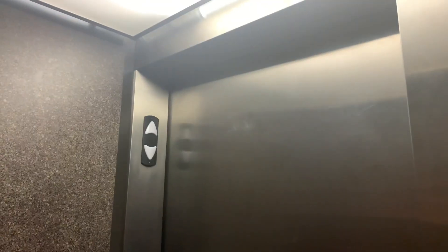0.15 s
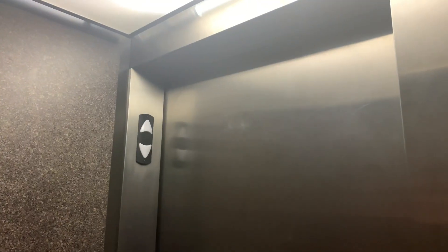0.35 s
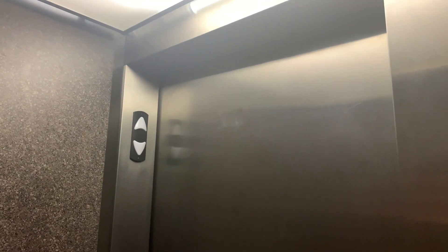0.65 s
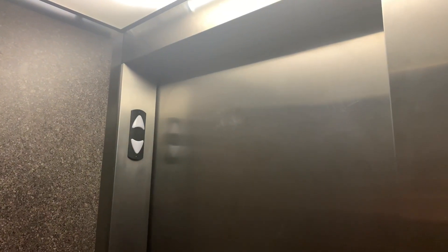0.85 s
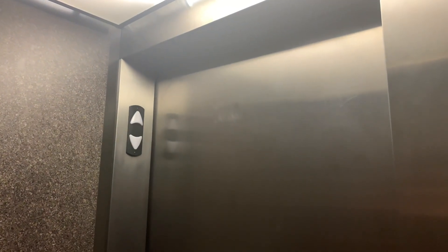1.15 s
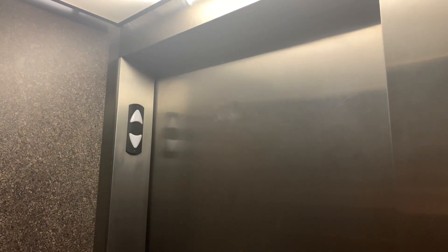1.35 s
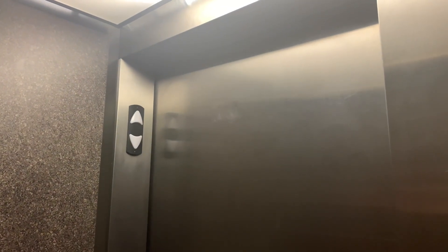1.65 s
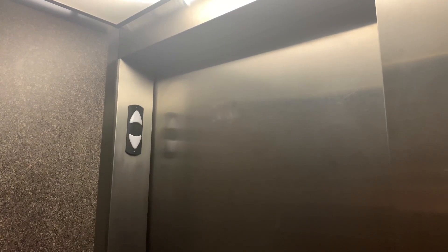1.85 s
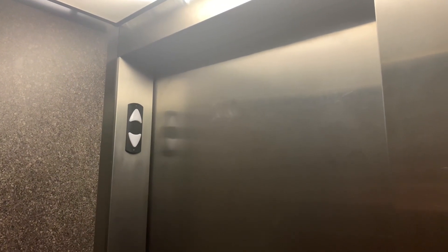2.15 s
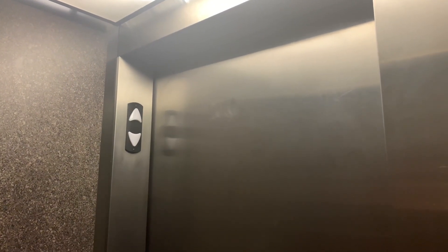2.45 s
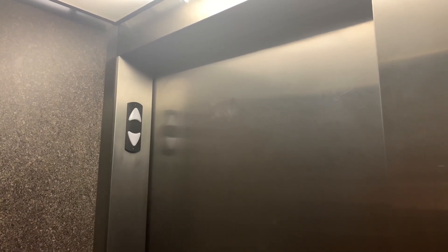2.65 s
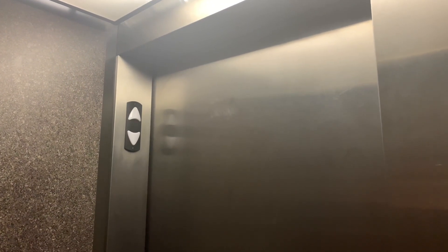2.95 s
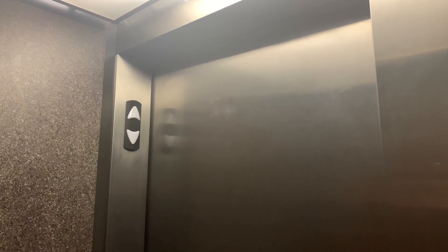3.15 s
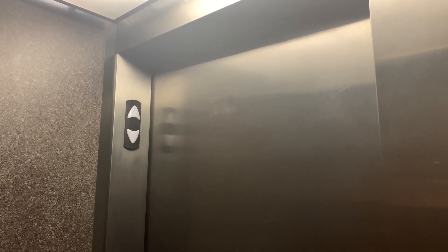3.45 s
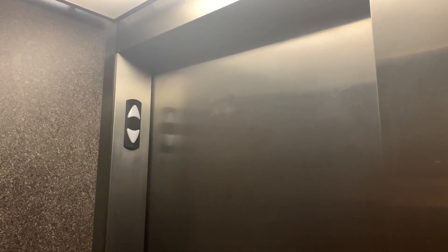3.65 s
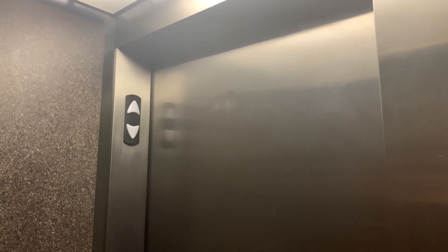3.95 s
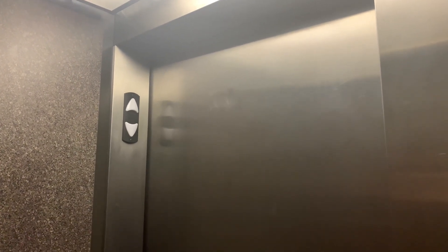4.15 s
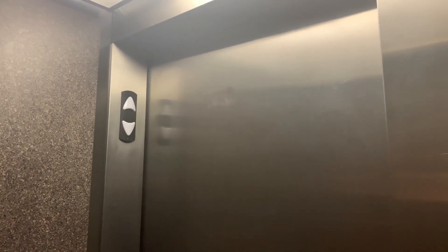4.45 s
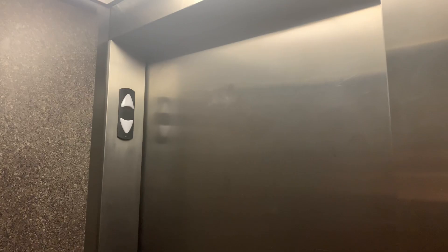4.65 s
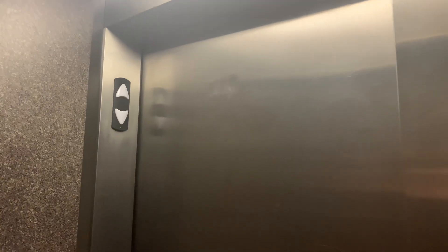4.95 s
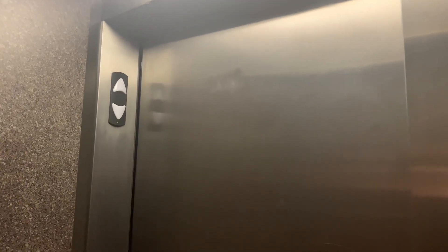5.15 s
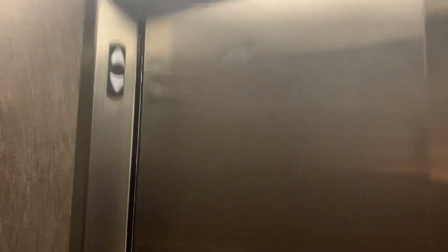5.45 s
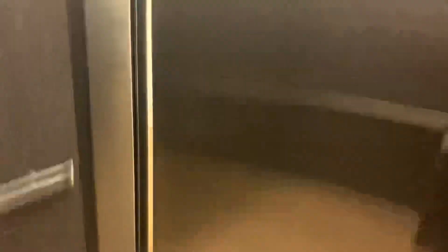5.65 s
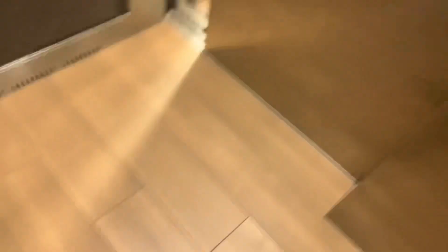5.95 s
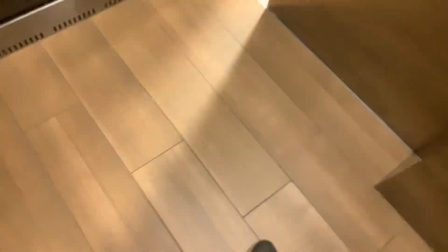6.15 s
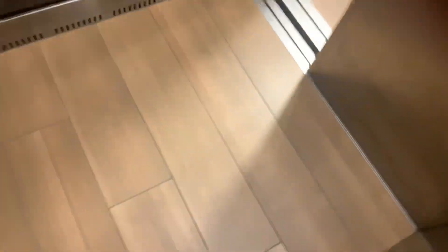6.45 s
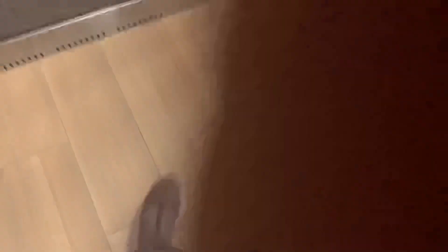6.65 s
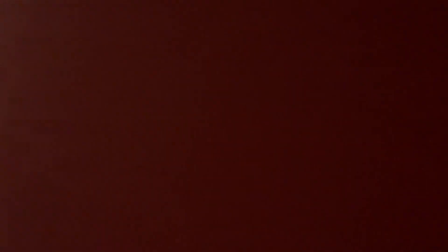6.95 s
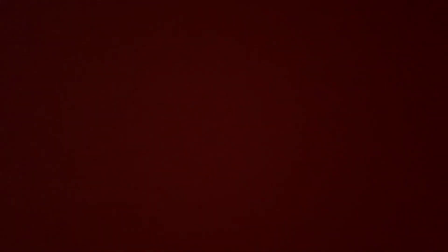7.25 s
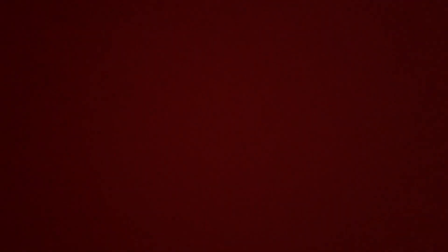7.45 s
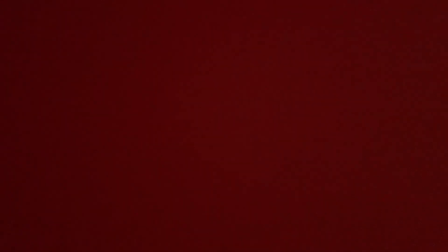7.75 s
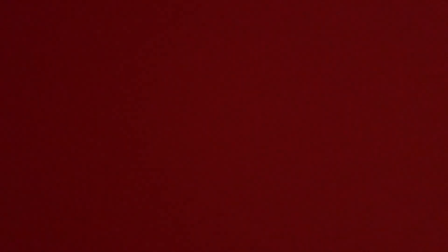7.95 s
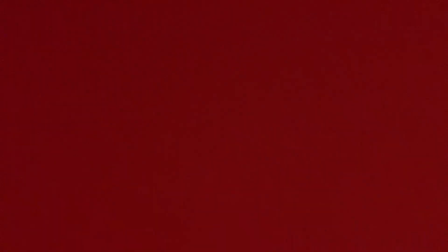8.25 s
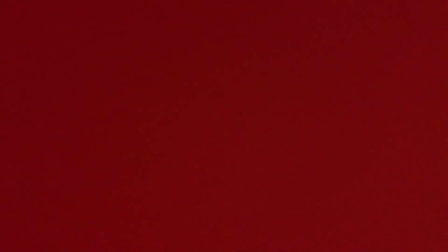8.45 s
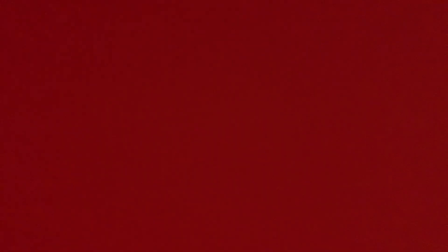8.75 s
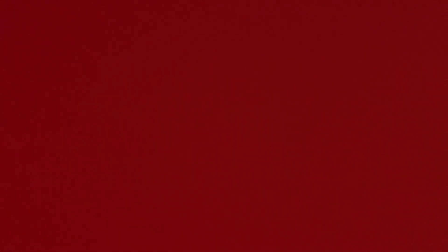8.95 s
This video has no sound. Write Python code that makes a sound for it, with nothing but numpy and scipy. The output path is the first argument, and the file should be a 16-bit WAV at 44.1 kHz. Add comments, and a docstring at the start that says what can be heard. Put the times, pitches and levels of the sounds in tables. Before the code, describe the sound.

Inside a steel elevator, pump hum and low rumble slow to a stop, then the door whirs open, bumps and slams with a loud metallic clang.

```python
"""Inside a hydraulic elevator

The steel cab rides on pump hum and rumble while shaft hardware clacks past, then stops.
The lock clatters, the door motor whines up and the door rolls open; fingers knock on the handheld microphone.
The door bumps its stop, and its linkage slams and rattles.
Wavering tones make the machines; shaped noise makes the flow, the rolling and the ringing blows."""
import sys
import numpy as np
from scipy import signal
from scipy.fft import irfft, next_fast_len
from scipy.io import wavfile
from scipy.ndimage import map_coordinates

SR = 44100
rng = np.random.default_rng(int(sys.argv[2]) if len(sys.argv) > 2 else 0)


def dump_mix(stems):
    """Bounce the given channels to the path in sys.argv[1] as a 16-bit WAV at rate SR."""
    frames = np.atleast_2d(stems).T  # one column per channel
    limited = np.clip(frames, -1, 1)  # hard clip at full scale
    pcm = np.round(limited * 32767).astype(np.int16)
    wavfile.write(sys.argv[1], SR, pcm)


N = 400869
TIME = np.arange(N) / SR
LEFT_LEAD_S = 0.000426  # sound reaches the left microphone this much earlier

# Spectrum tables give a shape only: noise() brings every noise to the same size.
# loudness of the left microphone against the right: pitch_hz, left_minus_right_db
BALANCE = [(60, -2), (150, -2), (400, -1), (1000, 1), (4000, -1)]
# effort of the door drive, heard in its whir: time_s, level_db
DOOR_EFFORT = [(5.3, -16), (5.57, -9), (5.67, 1), (5.81, -1.5), (6.09, -0.5), (6.35, -3), (6.48, -5.5),
               (6.71, -8), (6.82, -7), (7.08, -6), (7.35, -11), (7.55, -10.5), (7.7, -8), (7.78, -13.5)]
# spectrum of a hard steel clack: pitch_hz, level_db per Hz
CLACK_SPECTRUM = [(30, 9.5), (80, 4.5), (210, -3), (320, 7), (560, -3), (1000, -1), (1250, 1), (1420, -1.5),
                  (1600, -2), (1850, -1), (1980, -7.5), (2130, 0), (2280, -5), (2480, -5.5), (3400, -13),
                  (4300, -13), (7500, -22.5), (9600, -19), (12000, -14.5), (16000, -31)]


def amp(db):
    """Turn decibels into a gain."""
    return 10 ** (np.asarray(db) / 20)


def read(points, hz):
    """Read a curve over pitch, joined by straight lines over log frequency."""
    f, value = np.transpose(points)
    return np.interp(np.log(hz + 1), np.log(f + 1), value)


def level(rows, fade=0.052):
    """Gain along a curve of (time_s, level_db), fading out beyond its ends."""
    times, db = np.transpose(rows)
    outside = np.maximum(times[0] - TIME, 0) + np.maximum(TIME - times[-1], 0)
    return amp(np.interp(TIME, times, db)) * np.exp(-outside / fade)


def swell(start, rise, decay, hold=0):
    """Gain that rises steadily, holds and dies away; times in s."""
    age = TIME - start
    return np.clip(age / rise, 0, 1) * np.exp(-np.maximum(age - rise - hold, 0) / decay)


def ramp(start, length):
    """A steady change from 0 to 1; times in s."""
    return np.clip((TIME - start) / length, 0, 1)


def run_down(start, length):
    """Gain that fades ever faster, as of something that coasts to a halt; times in s."""
    return np.exp(-(np.maximum(TIME - start, 0) / length) ** 2)


def add(mix, s, sound):
    """Mix a sound in at time s, cutting off what runs past the end."""
    part = mix[:, round(s * SR):][:, :sound.shape[1]]
    part += sound[:, :part.shape[1]]


def drift(per_s):
    """Random wandering of about unit size, with per_s new random values each second."""
    knots = rng.standard_normal(2048)
    return map_coordinates(knots, [TIME[::64] * per_s], mode="wrap").repeat(64)[:N]


def resonances(modes):
    """Gain over frequency of a set of modes: (pitch_hz, width_hz, level_db); the power halves about 0.4
    width_hz from each peak."""
    def gain(hz):
        power = sum(amp(2 * db) / (1 + ((hz - f) / width) ** 2) ** 4.6 for f, width, db in modes)
        return np.sqrt(power)
    return gain


def noise(colour, size=N, tilt_db=0, ripple_db=0):
    """Diffuse noise at two microphones, alike in the bass; ripple is the comb of many crowded modes."""
    # how alike left and right are: pitch_hz, likeness (1 = identical)
    likeness = [(60, 0.98), (130, 0.72), (290, 0.91), (640, 0.26), (1410, 0.23), (3100, 0.036),
                (15000, 0.31)]
    hz = np.fft.rfftfreq(next_fast_len(size + size % 2, True) // 2 * 2, 1 / SR)
    a, b = rng.standard_normal((2, len(hz))) + 1j * rng.standard_normal((2, len(hz)))
    same = np.clip(read(likeness, hz), -1, 1)
    left = a * np.exp(2j * np.pi * hz * LEFT_LEAD_S)
    right = same * a + np.sqrt(1 - same ** 2) * b
    pair = np.array([left, right]) * amp(read(BALANCE, hz) * np.array([[.5], [-.5]]))
    bumps = np.interp(hz, np.linspace(0, SR / 2, 300), rng.standard_normal(300))
    comb = bumps * np.minimum(hz / 2000, 1)
    gain = colour(hz) if callable(colour) else amp(read(colour, hz))
    tilt = tilt_db * np.log2(np.maximum(hz, 200))  # tilt in dB per octave above 200 Hz
    x = irfft(pair * gain * (hz > 28) * amp(tilt + ripple_db * comb))[:, :size]
    return x / x.mean(0).std()


def tone(hz, waver, flutter, per_s):
    """A machine tone wavering in pitch and level, leading at the left by up to a quarter cycle."""
    phase = 2 * np.pi * np.cumsum(hz * (1 + waver * drift(per_s)) * np.ones(N)) / SR
    apart = min(2 * np.pi * np.mean(hz) * LEFT_LEAD_S, np.pi / 2)
    sides = amp(read(BALANCE, np.mean(hz)) * np.array([[.5], [-.5]]))
    return np.sqrt(2) * sides * np.cos([phase + apart, phase]) * (1 + flutter * drift(per_s))


def blow(colour, db, tilt_db, rise, ripple_db=3):
    """A blow sets countless panel and cab modes ringing; the treble dies first."""
    # cab reverberation: pitch_hz, time_to_fall_60_db_s
    ring = [(60, 1), (250, 1), (1000, 0.41), (3000, 0.52), (7000, 0.48), (16000, 0.16)]
    struck = noise(colour, size=49152, tilt_db=tilt_db, ripple_db=ripple_db)
    hz, t, z = signal.stft(struck, SR, nperseg=512)
    x = signal.istft(z * amp(-60 * t / read(ring, hz)[:, None]), SR, nperseg=512)[1]
    return amp(db) * x * np.minimum(np.arange(x.shape[1]) / SR / max(rise, 1e-4), 1)


def burst(colour, db, decay, rise, tilt_db=0):
    """The short direct sound of a hard contact."""
    t = np.arange(8192) / SR
    return amp(db) * noise(colour, size=8192, tilt_db=tilt_db) * np.exp(-t / decay) * (1 - np.exp(-t / rise))


def cab_reflections(x, t60):
    """Dense reflections between the steel walls smear a tone."""
    t = np.arange(SR // 2) / SR
    tail = rng.standard_normal((2, len(t))) * amp(-60 * t / t60)
    return signal.fftconvolve(x, tail / np.linalg.norm(tail[0]), axes=1)[:, :N]


def cab_boom():
    """The cab booms in its lowest modes as it sways along the rails and comes to rest."""
    # lowest modes of the cab, before the sway: pitch_hz, level_db
    modes = [(37, -34), (55, -22.5), (70.5, -6.5), (83, -2.5)]
    # spectrum of the rumble: pitch_hz, level_db per Hz
    rumble = [(28, -20), (36, -1.5), (50, 0), (75, 8), (90, 4.5), (110, -9.5), (135, -9.5), (170, -24),
              (400, -78)]
    # level of the boom: time_s, level_db
    sway = [(0.0, -30), (0.7, -24), (1.0, -29.5), (1.38, -22.5), (1.6, -28), (1.92, -20), (2.2, -29.5),
            (2.6, -28), (3.15, -23.5), (3.55, -29.5), (3.97, -44), (4.5, -49.5)]
    boom = sum(amp(db) * tone(hz, waver=0.02985, flutter=0.23, per_s=9) for hz, db in modes)
    return (boom + amp(-4.5) * noise(rumble)) * level(sway)


SLOW_AT_S, CHANGE_S = 1.55, 0.16  # the pump drops to levelling speed
RUN_DOWN_S = 0.56  # the pump, and the oil with it, run down


def pump():
    """The pump sings steady tones whose balance shifts at levelling speed; switched off, it runs down."""
    # pump tones, before the trim: pitch_hz, full_speed_level_db, levelling_level_db
    tones = [(190, -52.5, -48), (255.4, -45.5, -47), (328, -61.5, -65.5), (348.2, -46, -43.5),
             (402, -69, -60), (394, -58.5, -56.5), (471.7, -41, -42), (621, -48, -57.5),
             (613.6, -55.5, -47), (675, -71.5, -58.5), (710, -47, -56.5), (819, -64, -48),
             (870, -67.5, -66), (1056, -58, -55), (1157, -59, -54.5), (1415, -61.5, -71.5),
             (1770, -63, -66)]
    trim_db, off_at_s = -1, 3.22
    slow = ramp(SLOW_AT_S, CHANGE_S)  # the load on the pump changes
    song = 0
    for hz, fast_db, slow_db in tones:
        gain = amp(fast_db + slow * (slow_db - fast_db))
        song = song + gain * tone(hz, waver=0.00305, flutter=0.29, per_s=8)
    return amp(trim_db) * song * run_down(off_at_s, RUN_DOWN_S)


def oil():
    """Pulsing oil rush: it surges as the pump slows, then the valve shuts off most of the flow."""
    # spectrum of the flow: pitch_hz, level_db per Hz
    spectrum = [(70, -3), (130, 6), (200, -4.5), (250, -1), (295, -6.5), (340, -2), (380, -4.5), (450, 0.5),
                (540, -3.5), (660, -2.5), (790, -8), (880, -8.5), (980, -14.5), (1350, -16.5), (1480, -21),
                (1800, -25.5), (2400, -33.5), (3600, -56), (8000, -76.5), (16000, -86.5)]
    surge_db, surge_decay_s = 4.5, 0.28
    flow_db, shut_at_s, shut_s, shut_db = -37.5, 3.66, 0.05, -10
    pulsing = 1 + .22 * np.cos(2 * np.pi * 58.6 * TIME)
    surge = surge_db * swell(SLOW_AT_S, CHANGE_S, surge_decay_s)
    oil_db = flow_db + surge + shut_db * ramp(shut_at_s, shut_s)
    # the slowing flow crosses over to a darker one within 0.19 s
    slowed = ramp(shut_at_s + .05, 0.19)
    flow = noise(spectrum) * np.sqrt(1 - slowed)
    flow = flow + noise(spectrum, tilt_db=-4.5) * np.sqrt(slowed)
    return flow * pulsing * amp(oil_db + 1.0 * drift(21)) * run_down(shut_at_s, RUN_DOWN_S)


def valve():
    """Oil rushes through the narrowing valve, murmurs as it seats and puffs as it closes fully."""
    # rush and puff spectra: pitch_hz, level_db per Hz
    rush = [(120, 1.5), (190, 3.5), (260, -0.5), (295, -12), (345, 3.5), (420, -16), (600, -16), (760, -12),
            (940, -13.5), (1130, -14.5), (1700, -26.5), (3000, -48), (10000, -71.5), (16000, -75)]
    puff = [(300, -4), (900, 0), (1500, -5), (2400, -9), (3500, -19), (6000, -27), (9000, -44),
            (16000, -60)]
    # resonances of the murmur at the valve seat: pitch_hz, width_hz, level_db
    seat = [(838, 74, 5.5), (1120, 200, -8), (560, 160, -8.5), (1380, 130, -16)]
    rush_at_s, rush_rise_s = 3.308, 0.17
    flow = amp(-36) * noise(rush) * ramp(rush_at_s, rush_rise_s)
    flow *= run_down(rush_at_s + rush_rise_s, 0.55)
    flow += amp(-53.5) * noise(resonances(seat)) * swell(3.795, rise=0.077, decay=0.12, hold=0.2)
    flow += amp(-57.5) * noise(puff) * swell(3.93, rise=.06, decay=.045, hold=.05)
    return flow


SLAM_AT_S = 8.005


def standing():
    """Steady low rumble and the noise of the powered door gear, both swelling at each shudder."""
    # spectra of the low rumble and of the body noise: pitch_hz, level_db per Hz
    low_spectrum = [(28, -24), (37, -3), (58, 1), (90, -3), (120, -7), (200, -52), (600, -60.5)]
    body_spectrum = [(70, -4), (170, 2.5), (300, 3), (460, 2.5), (620, -13), (900, -7.5), (1700, -11.5),
                     (3000, -23.5), (6000, -37.5), (16000, -120)]
    # the cab settles, unlocks and takes the door's blows:
    # start_s, low_rumble_db, body_db, rise_s, decay_s
    shudders = [(4.68, -28, -38, 0.16, 0.11), (4.98, -48, -47.5, 0.05, 0.4), (7.76, -35.5, -50, 0.084, 0.3),
                (7.99, -28.5, -29.5, 0.0065, 0.033), (8.2, -49, -44.5, 0.098, 0.42)]
    rest_db, gear_on_at_s, gear_idle_db, track_rumble_db = -49, 4.55, -51.5, -44.5
    # separate noises add up by power
    low_power = amp(rest_db) ** 2
    body_power = (amp(gear_idle_db) * ramp(gear_on_at_s, 0.028)) ** 2
    body_power = body_power + (amp(track_rumble_db) * level(DOOR_EFFORT)) ** 2
    for s, low_db, body_db, rise, decay in shudders:
        shake = swell(s, rise, decay)
        low_power = low_power + (amp(low_db) * shake) ** 2
        body_power = body_power + (amp(body_db) * shake) ** 2
    rattling = sum(noise(body_spectrum, ripple_db=5) * amp(2.5 * drift(16)) for _ in range(3)) / 2
    return noise(low_spectrum) * np.sqrt(low_power) + rattling * np.sqrt(body_power)


def landing_air():
    """Air of the landing comes in as the doorway widens, and is fainter once the door has stopped."""
    # spectrum of the air: pitch_hz, level_db per Hz
    spectrum = [(200, -3.5), (800, -2), (1300, -9.5), (2200, -5.5), (3300, -7.5), (5500, -11),
                (8000, -25.5), (11000, -25.5), (16000, -26.5)]
    hiss_db, open_db, after_db = -89, -48, -57.5
    # the power of 1.2 slows the start of the rise and quickens the decay
    opening = swell(4.94, rise=2.68, decay=0.18, hold=0.43) ** 1.2
    doorway = amp(open_db) * opening + amp(after_db) * ramp(SLAM_AT_S, 0.15)
    return noise(spectrum) * (amp(hiss_db) + doorway)


def clacks():
    """Shaft hardware knocks on the passing cab; a soft scrape swells up and ends at one of the clacks."""
    # passing switches and cams: time_s, level_db, brightness_db per octave, rise_s
    passing = [(0.368, -47.5, 3.5, 0.0085), (1.533, -43.5, 6.5, 0.022), (1.592, -26, 1, 0.0027),
               (1.612, -25.5, 0, 0.0026), (3.465, -30.5, 2.5, 0.0053), (3.495, -29, 0, 0.0035),
               (3.6, -28, -6.5, 0.0044), (3.749, -44.5, -3, 0.009)]
    out = np.zeros((2, N))
    fade = run_down(0, 0.38)  # each clack's ring fades out early
    for s, db, tilt_db, rise in passing:
        clack = blow(CLACK_SPECTRUM, db, tilt_db, rise)
        add(out, s, clack * fade[:clack.shape[1]])
    # squaring makes the scrape start gently and die twice as fast
    scrape = swell(3.3, rise=0.2, decay=0.02) ** 2
    return out + amp(-50) * noise(CLACK_SPECTRUM) * scrape


def lock():
    """The lock lifts and the coupler takes up its slack: uneven knocks, each favouring its own pitch region."""
    # knocks: time_s, level_db, brightness_db per octave, rise_s, favoured_hz, lift_there_db
    knocks = [(4.54, -54, 0.9, 0.0073, 805, -3), (4.56, -44.5, -4, 0.011, 750, 9),
              (4.669, -37, 0.5, 0.024, 1550, -1), (4.698, -31.5, 1, 0.016, 610, 3.5),
              (4.786, -35, 2.6, 0.027, 1450, 10), (4.832, -36, 0.5, 0.0045, 360, 2),
              (4.875, -43, -3, 0.0058, 1400, 3), (4.935, -39, -5.5, 0.0072, 480, 5),
              (5.035, -37.5, -4.5, 0.0088, 477, 7.5), (5.084, -49.5, -3.5, 0.008, 520, -1),
              (5.22, -46.5, -2.5, 0.024, 1600, 15), (5.265, -44, -2, 0.011, 1500, 10)]
    # spectrum of the latch's ring: pitch_hz, level_db per Hz
    latch = [(30, 2.5), (80, 6.5), (200, -11.5), (310, 2.5), (420, -5), (560, -0.5), (800, -5.5), (950, 3),
             (1150, -6.5), (1600, -10), (2100, -17), (2600, -18), (3200, -25), (5800, -25.5),
             (10000, -34.5), (16000, -31)]
    favoured_octaves, scrape_db = 0.26, 1.5  # width of the region, unevenness of the scraping
    out = np.zeros((2, N))
    for s, db, tilt_db, rise, favoured_hz, lift_db in knocks:
        def colour(hz):
            octaves_off = np.log2((hz + 1) / favoured_hz)
            return amp(read(latch, hz) + lift_db * np.exp(-(octaves_off / favoured_octaves) ** 2))
        knock = blow(colour, db, tilt_db, rise, ripple_db=5.5)
        add(out, s, knock * amp(scrape_db * drift(71))[:knock.shape[1]])
    return out


def squeaks():
    """Brief rough chirps of the door gear that swell and ring out in the cab."""
    # chirps, at their loudest after a quarter of the length: time_s, pitch_hz, level_db, length_s
    chirps = [(4.667, 1545, -52, .06), (4.784, 1780, -42, 0.05), (5.625, 4580, -54, .07),
              (5.668, 2400, -48, .08), (5.73, 2420, -51, .08), (5.735, 4740, -57, .06),
              (6.119, 4075, -51, 0.08), (7.932, 4110, -40, 0.03), (7.935, 2045, -24.5, 0.023),
              (7.956, 2015, -32, .013)]
    out, t = np.zeros((2, N)), np.arange(SR // 2) / SR
    for s, hz, db, length in chirps:
        u = t / (length / 4)
        ringing_out = .17 * (1 - np.exp(-u)) * np.exp(-t / .07)
        shape = u * np.exp(1 - u) + ringing_out
        rough = tone(hz, waver=70 / hz, flutter=.7, per_s=500)  # strays by about 70 Hz
        add(out, s, amp(db) * shape * rough[:, :len(t)])
    return out


def bumps():
    """The door hits its rubber coupler and end stop: a hard contact, a noisy ring and a few panel notes."""
    # hits, panel ring before a 2 dB cut: time_s, level_db, brightness_db per octave, rise_s, panel_ring_db
    hits = [(5.252, -32.5, -9.5, 0.035, -41), (7.798, -26.5, 1.5, 0.0015, -19),
            (7.822, -20.5, -22, 0.0032, -27), (7.847, -20.5, 0.6, 0.0043, -16),
            (7.92, -26, 3, 0.046, -20.5)]
    # spectrum of the hit: pitch_hz, level_db per Hz
    spectrum = [(30, -28), (120, -34), (230, 2.5), (340, 5.5), (640, 3.5), (850, -5.5), (1500, -4.5),
                (2100, -7.5), (3300, -10), (7000, -21), (10000, -22), (16000, -35)]
    # notes of the door panel, before the rubber's damping: pitch_hz, level_db, time_to_fall_60_db_s
    panel_notes = [(222, 1.5, 0.51), (258, -21, 0.19), (293, -16, 0.81), (485, -9.5, 0.46), (651, -8, 0.55)]
    out, t = np.zeros((2, N)), np.arange(49152) / SR
    panel = sum(amp(db - 60 * t / t60) * np.sin(2 * np.pi * hz * t) for hz, db, t60 in panel_notes)
    panel = panel * (1 - np.exp(-t / 0.0086))
    damping = np.exp(-t / 0.095)  # the rubber stays pressed against the door
    for s, db, tilt_db, rise, ring_db in hits:
        ring = blow(spectrum, db, tilt_db, rise) * np.sqrt(damping)
        add(out, s, ring + amp(ring_db - 2.0) * panel * damping)
        # the first contact is a little quieter and brighter than the ring
        add(out, s, burst(spectrum, db - 1, decay=0.0083, rise=rise, tilt_db=tilt_db + 3.5))
    return out


def motor():
    """The motor's whine climbs in steps through the housing's resonances: a firm core in a rough halo."""
    # the motor spins up: time_s, whine_pitch_hz
    spin_up = [(5.35, 1174), (5.4, 1230), (5.435, 1340), (5.49, 1357), (5.54, 1396), (5.565, 1510),
               (5.61, 1532), (5.66, 1517), (5.75, 1580)]
    # how strongly the drive housing passes the whine: pitch_hz, level_db
    whine_body = [(1150, -12), (1300, -6), (1390, 1), (1560, 3), (1700, -2), (2250, -5), (2450, 0),
                  (2700, 0), (2900, -17), (3120, -7), (3350, -17), (3750, -24), (4020, -18), (4250, -21),
                  (4600, -18), (5000, -24), (5450, -16), (5800, -24), (6600, -24), (7800, -24)]
    # housing resonances: pitch_hz, width_hz, level_db
    housing_modes = [(2356, 210, 4), (1660, 170, -4), (3260, 220, -10), (4400, 870, -13),
                     (5700, 490, -13.5)]
    # the housing rings as the motor takes up the load: start_s, level_db
    strains = [(5.38, -44.5), (5.545, -44.5), (5.655, -51), (5.72, -63)]
    core_db, halo_db = -45, -44.5
    whine_hz = np.interp(TIME, *np.transpose(spin_up))
    partials = []
    for k in range(1, 6):
        gain = amp(read(whine_body, k * whine_hz) + 2 * drift(40))
        partials.append((k * whine_hz, gain))
    core = sum(gain * tone(hz, waver=.007, flutter=.35, per_s=150) for hz, gain in partials)
    halo = sum(gain * tone(hz, waver=.04, flutter=.6, per_s=300) for hz, gain in partials)
    load = swell(5.335, rise=0.12, decay=0.039, hold=0.16)
    strain = sum(amp(db) * swell(s, rise=0.042, decay=0.044) for s, db in strains)
    housing = noise(resonances(housing_modes)) * amp(2.8 * drift(40)) * strain
    return amp(core_db) * core * load + cab_reflections(amp(halo_db) * halo * load, t60=0.24) + housing


def rollers():
    """Rollers whir along the track, with patches of pitch that swell and fade."""
    # spectrum of the whir: pitch_hz, level_db per Hz
    spectrum = [(300, -35), (680, -9), (800, -3), (860, 1), (950, 3), (1080, 1), (1200, -6), (1340, -2.5),
                (1500, -14), (1750, -20.5), (2150, -18), (3000, -36), (6000, -60)]
    roller_db = -40  # where the effort curve reads 0 dB
    # four noises with different ripples, drifting in level, make the moving patches
    whir = sum(noise(spectrum, ripple_db=6) * amp(4 * drift(14)) for _ in range(4)) / 2
    return amp(roller_db) * whir * level(DOOR_EFFORT)


def shoes():
    """Door shoes hiss in the sill, louder as the microphone turns their way, until a finger covers it a while."""
    # spectrum of the hiss: pitch_hz, level_db per Hz
    spectrum = [(1000, 11.5), (2200, -8), (3200, -6), (4500, 4), (7300, 0.5), (8400, -20), (10200, 12),
                (12000, -2), (13500, -20), (16000, -3)]
    slide_db, cover_db = -51.5, -34
    covered = ramp(6.62, 0.0087) - ramp(6.817, .004)
    # the power of 0.8 quickens the start of the rise and stretches the decay
    sliding = swell(5.377, rise=1.17, decay=0.034, hold=1.12) ** 0.8
    return noise(spectrum) * amp(1.4 * drift(60)) * sliding * amp(slide_db + cover_db * covered)


def chord(notes, bend):
    """Gear notes (pitch_hz, level_db) that each stray in pitch and swell on their own."""
    wander, swell_db = .006, 3.5
    total = 0
    for hz, db in notes:
        gain = amp(db + swell_db * drift(6))
        pitch = hz * bend * (1 + wander * drift(9))
        total = total + gain * tone(pitch, waver=.008, flutter=.45, per_s=60)
    return total


def gears():
    """The drive sings one chord pulling the door away, then an evenly spaced one that sags as the door brakes."""
    # notes while pulling and while cruising, before bend and effort: pitch_hz, level_db
    pull_notes = [(937, -35), (1075, -39), (1208, -43), (1300, -48)]
    cruise_notes = [(770, -47), (862, -49), (957, -38), (1054, -40.5), (1150, -43), (1256, -47.5),
                    (1360, -50)]
    pull_at_s, pull_s, cruise_after_s = 5.87, 0.123, 0.56  # hardest pull, its half length, time until cruising
    pull = np.exp(-((TIME - pull_at_s) / pull_s) ** 2)
    pull_bend = 1 - 0.023 * (1 - pull)  # notes lie lower before and after the hardest pull
    cruise = ramp(pull_at_s, cruise_after_s) * level(DOOR_EFFORT)
    brake_bend = 1 - 0.0605 * ramp(7.5, 0.279)  # share of pitch lost, start s, length s
    return chord(pull_notes, pull_bend) * pull + chord(cruise_notes, brake_bend) * cruise


def rattles():
    """The loose linkage rattles as the door rolls and after the slam: hard clacks with a damped ring."""
    # contacts: time_s, level_db, brightness_db per octave, rise_s, favoured_hz, lift_there_db
    contacts = [(6.117, -46, 1, 0.0042, 6300, 3), (8.281, -36, -1.5, 0.0022, 7400, 5),
                (8.428, -37, 0.5, 0.0039, 3320, 11), (8.7, -37.5, -0.5, 0.017, 5750, 0),
                (8.83, -47, -3, 0.033, 3000, 4), (8.915, -46.5, -2, 0.026, 5700, 0)]
    # linkage modes: pitch_hz, width_hz, level_db
    link_modes = [(794, 110, 5.5), (956, 49, 7.5), (1240, 38, 3), (1730, 180, -7), (2240, 160, -2.5),
                  (3430, 76, -4.5), (4070, 90, 4.5), (4370, 80, -0.5), (3950, 3100, -8.5), (5550, 130, 2.5),
                  (6020, 130, 0), (6500, 280, -1), (7200, 150, -5.5), (10970, 1600, -5.5)]
    favoured_octaves = 0.17  # width of the favoured region
    out, t = np.zeros((2, N)), np.arange(49152) / SR
    for s, db, tilt_db, rise, favoured_hz, lift_db in contacts:
        struck = []
        for hz, width, mode_db in link_modes:
            nearness = np.exp(-(np.log2(hz / favoured_hz) / favoured_octaves) ** 2)
            struck.append((hz, width, mode_db + lift_db * nearness))
        add(out, s, blow(resonances(struck), db, tilt_db, rise) * np.exp(-t / 0.15))
        add(out, s, burst(CLACK_SPECTRUM, db - 3.5, decay=0.022, rise=rise, tilt_db=tilt_db + 2.0))
    return out


def fingers():
    """Fingers on the microphone case: a dry tick, a hollow knock and a thud that sinks in pitch."""
    # knocks: time_s, thud_db, final_thud_pitch_hz, case_db, tick_db, tick_brightness_db per octave, tick_decay_s
    knocks = [(6.166, -19.5, 85, -25, -19, 0.5, 0.0018), (6.337, -44, 80, -46, -29, -3, .0015),
              (6.517, -39, 89, -29, -36, -6, 0.007), (6.529, -33, 70, -31, -28, -5, 0.0027),
              (6.543, -25, 55, -32, -48, -5, .003), (6.611, -40, 110, -38, -25, -1.5, 0.0024),
              (6.616, -23, 78, -33, -42, -3, .002), (6.817, -60, 70, -55, -32, 7, 0.0033)]
    # spectra of the hollow case and the dry tick: pitch_hz, level_db per Hz
    case_spectrum = [(60, -3), (130, 2), (380, -3), (650, -14), (1200, -12), (4000, -50)]
    tick_spectrum = [(200, 6), (700, 12), (2500, -2.5), (6000, -28), (11000, -16), (16000, -43)]
    out, t = np.zeros((2, N)), np.arange(8192) / SR
    for s, thud_db, hz, case_db, tick_db, tilt_db, decay in knocks:
        pitch = hz * (1 + 5.05 * np.exp(-t / 0.0045))  # starts about six times as high
        thud = np.sin(2 * np.pi * np.cumsum(pitch) / SR)
        thud = thud * np.exp(-t / 0.012) * (1 - np.exp(-t / 0.0035))
        case = burst(case_spectrum, case_db, decay=0.0093, rise=0.0035)
        tick = burst(tick_spectrum, tick_db, decay, rise=0.00063, tilt_db=tilt_db)
        add(out, s, amp(thud_db) * thud + case + tick)
    return out


def slam():
    """The steel linkage slams home with a sharp crack and a long ring, then chatters."""
    # spectra of the ring and the first crack: pitch_hz, level_db per Hz
    ring = [(30, -12), (90, 3), (300, 4), (600, 2.5), (780, 10), (1000, 4), (1200, 2.5), (1420, 7),
            (1680, 10), (1900, 5.5), (2400, -1.5), (3200, -2), (5800, -6.5), (16000, -16)]
    crack = [(100, -6), (800, -17), (1300, 12), (1680, 16), (2000, -1), (2450, 2), (3600, -6), (4300, 10.5),
             (4900, -8), (5700, 5), (6400, 5), (7500, -42), (10000, -6), (16000, -35)]
    # chatter just after the slam: time_s, level_db
    chatter = [(8.019, -19), (8.031, -21), (8.051, -37), (8.074, -39), (8.122, -38)]
    out = np.zeros((2, N))
    add(out, SLAM_AT_S, blow(ring, -20.5, tilt_db=-1, rise=0.007))
    add(out, SLAM_AT_S, burst(crack, -9, decay=0.008, rise=0.002))
    for s, db in chatter:
        add(out, s, burst(ring, db, decay=0.0088, rise=0.00087))
    return out


def scene():
    """All the sounds together."""
    ride = cab_boom() + pump() + oil() + valve()
    cab = standing() + landing_air() + clacks()
    opening = lock() + squeaks() + bumps() + motor() + rollers() + shoes() + gears()
    return ride + cab + opening + rattles() + fingers() + slam()


def record(dry):
    """The band limit of the recorder: little passes above 15.9 kHz."""
    low_pass = signal.firwin(511, 15900, window=("kaiser", 9), fs=SR)
    return signal.oaconvolve(dry, low_pass[None], "same")


dry = scene()
out = record(dry)
dump_mix(out)
```